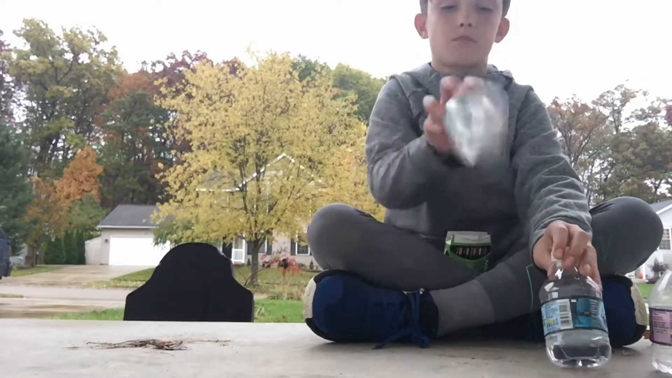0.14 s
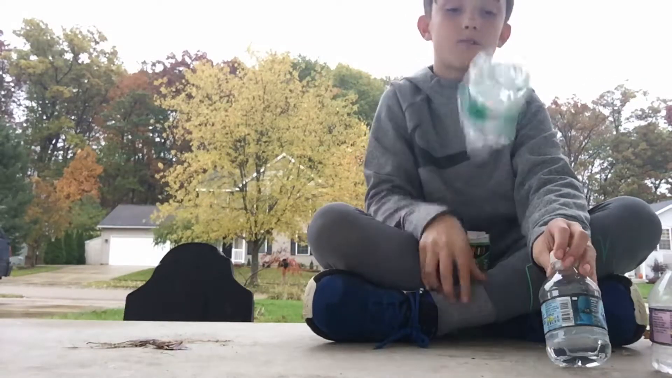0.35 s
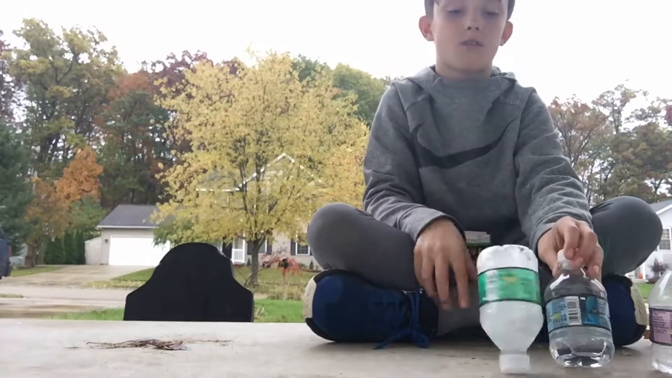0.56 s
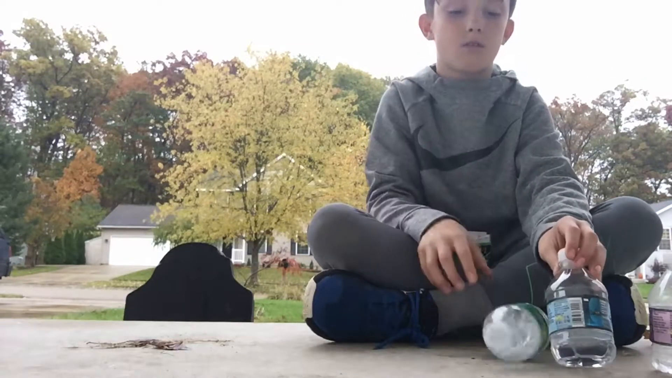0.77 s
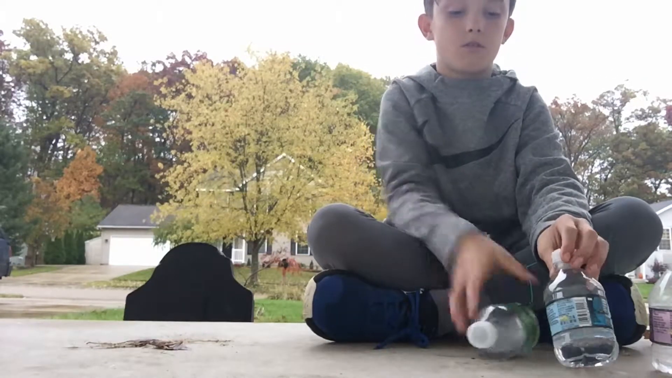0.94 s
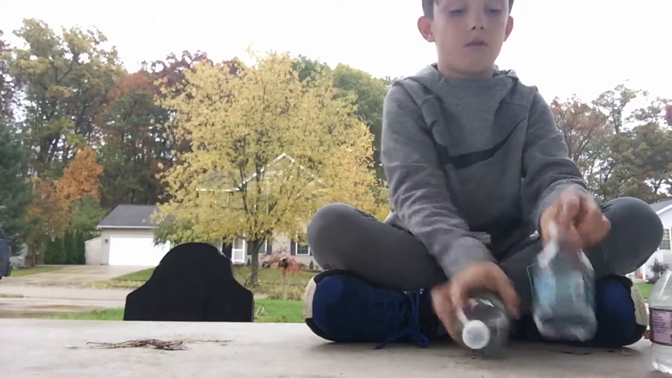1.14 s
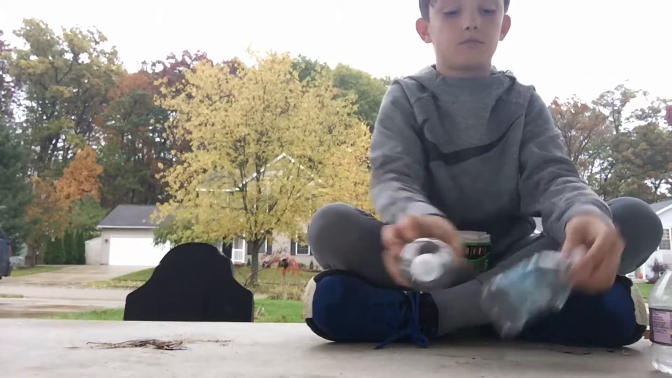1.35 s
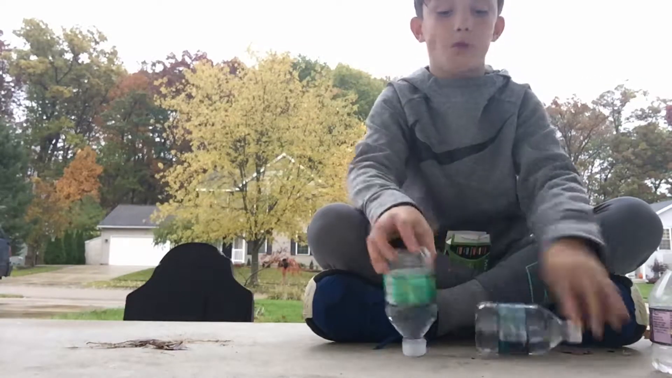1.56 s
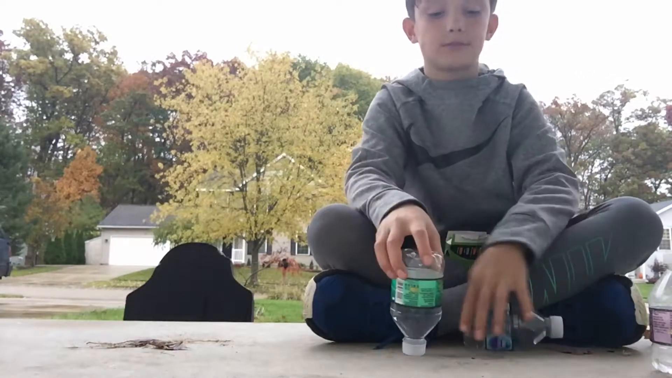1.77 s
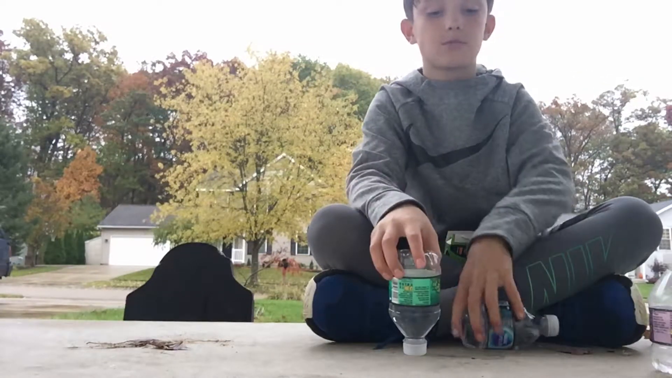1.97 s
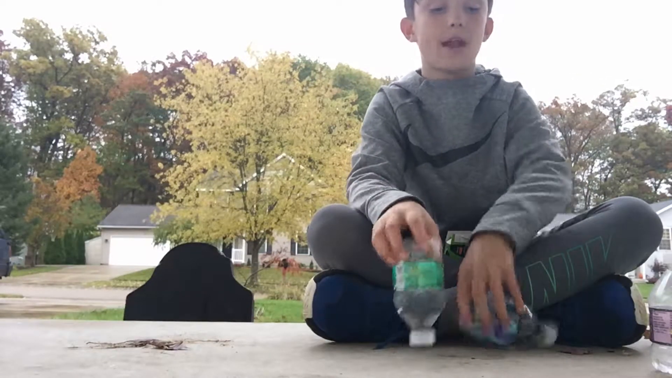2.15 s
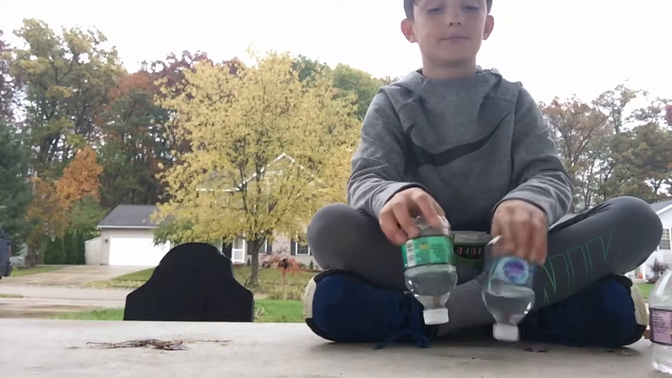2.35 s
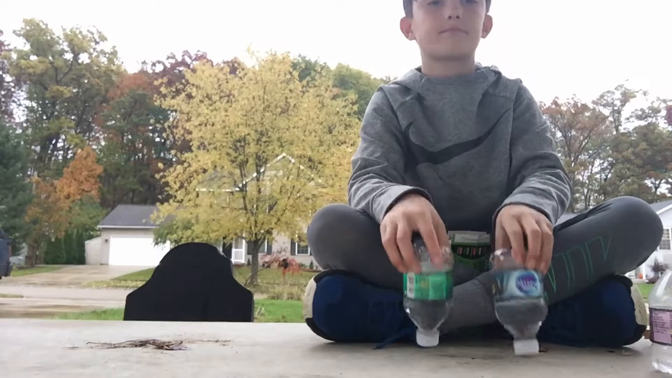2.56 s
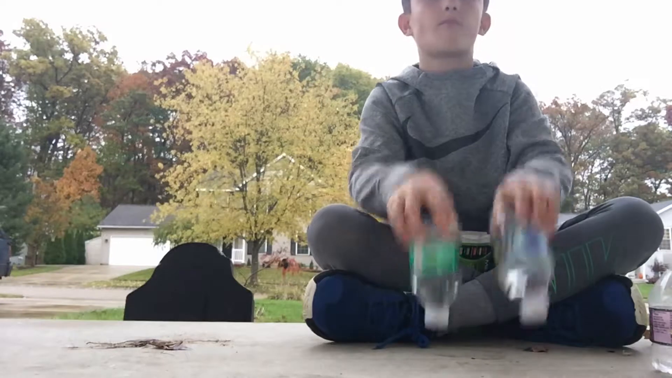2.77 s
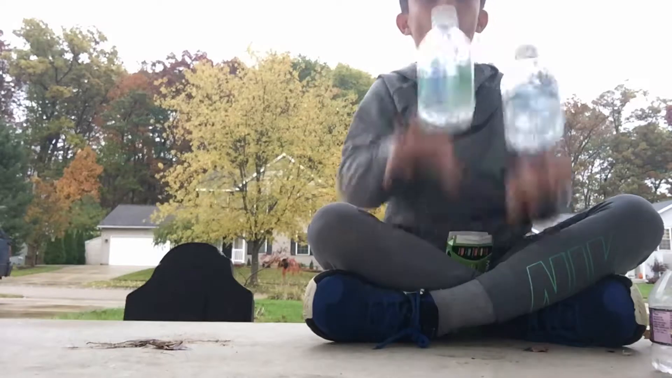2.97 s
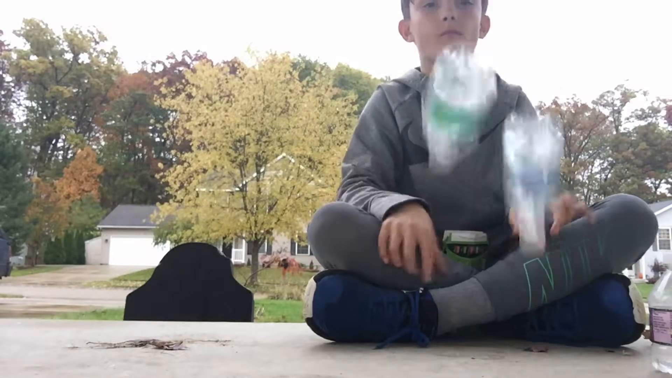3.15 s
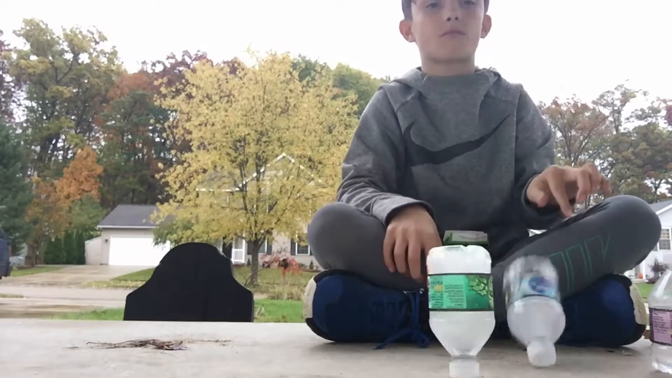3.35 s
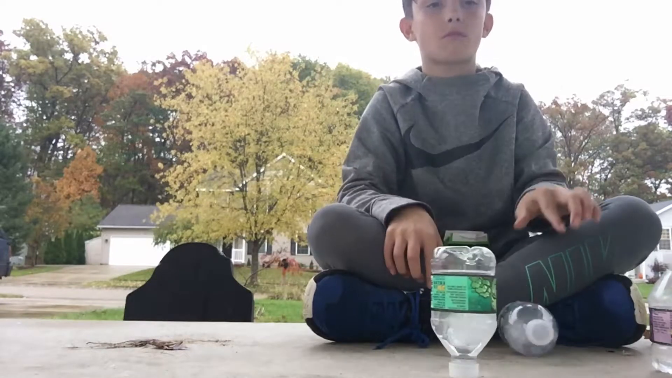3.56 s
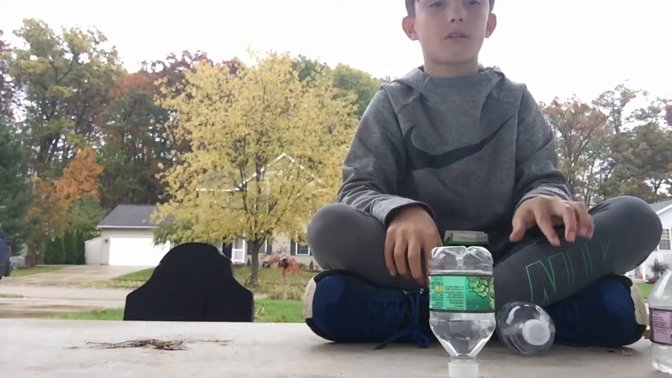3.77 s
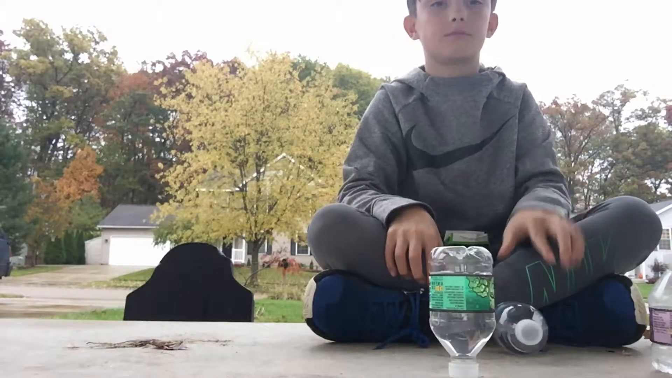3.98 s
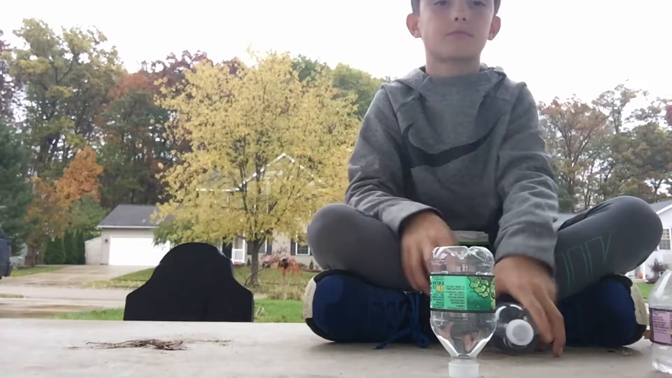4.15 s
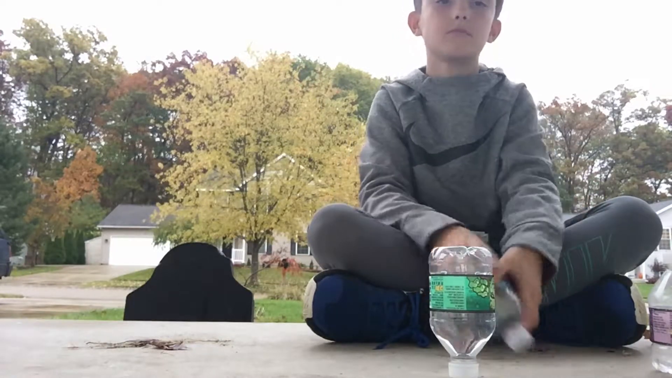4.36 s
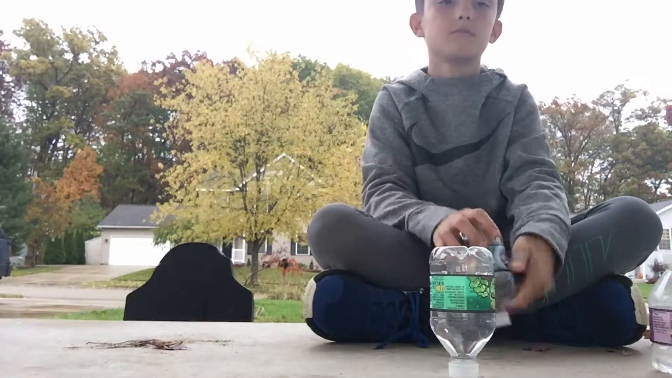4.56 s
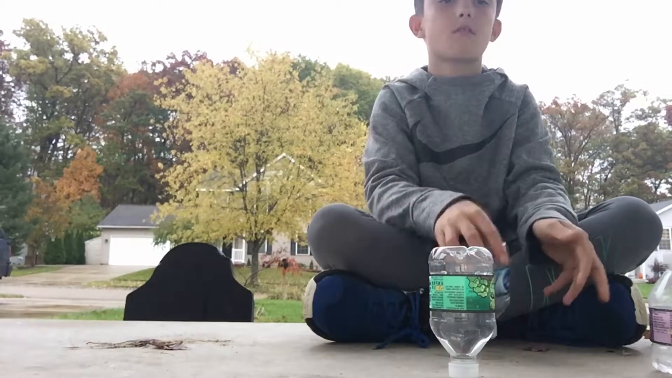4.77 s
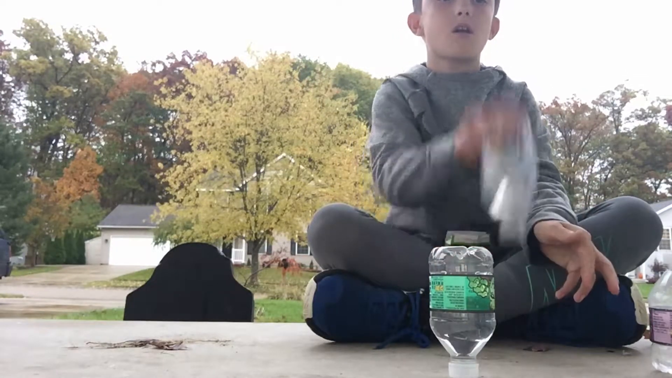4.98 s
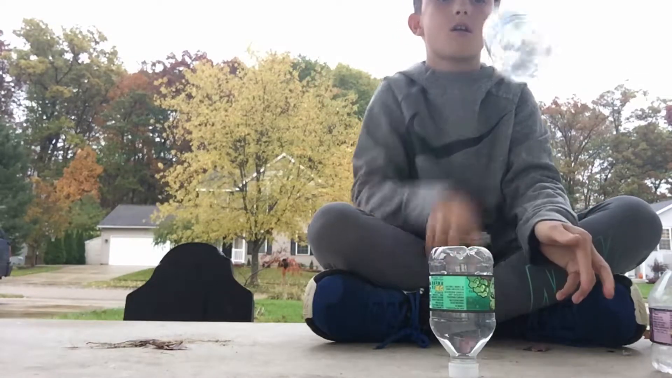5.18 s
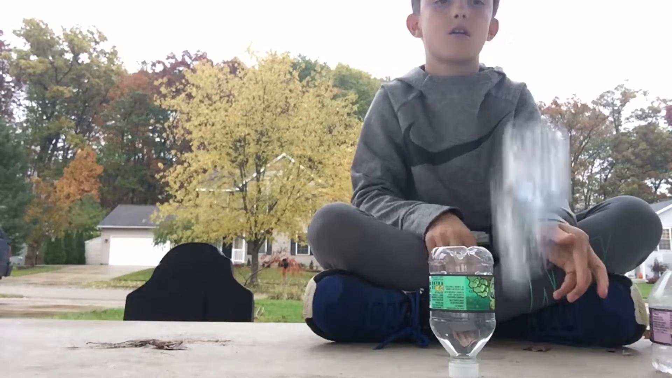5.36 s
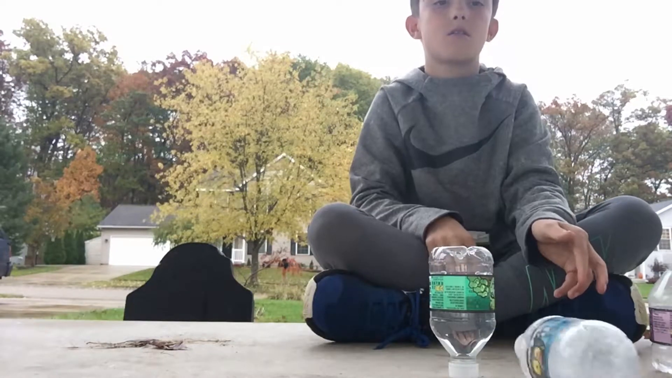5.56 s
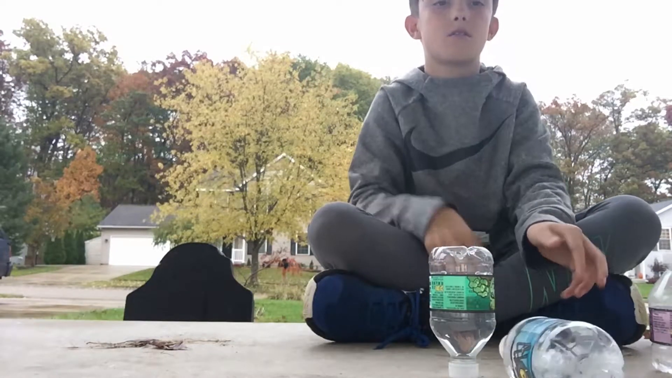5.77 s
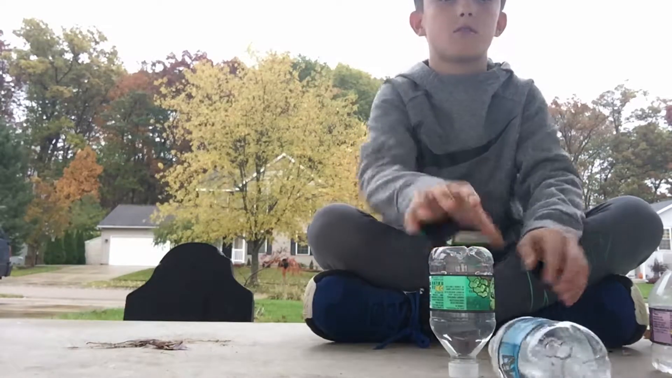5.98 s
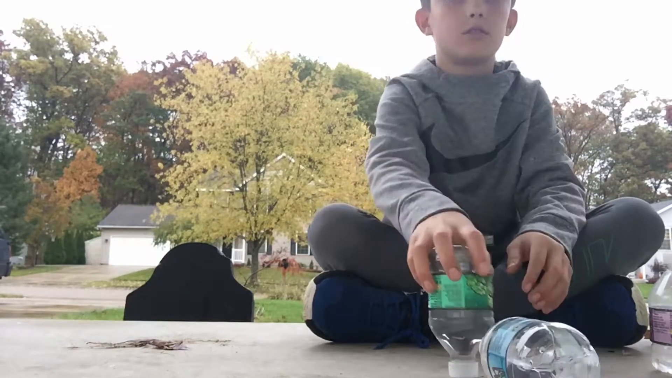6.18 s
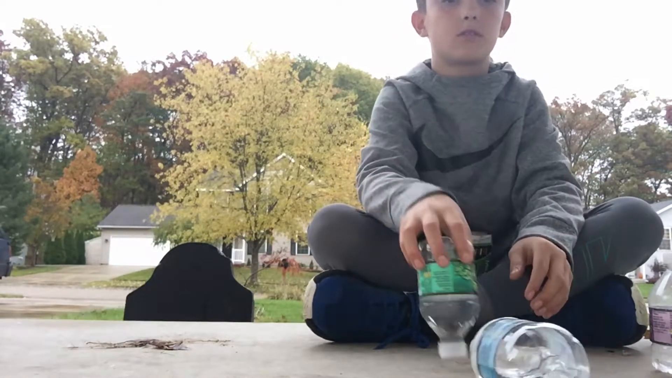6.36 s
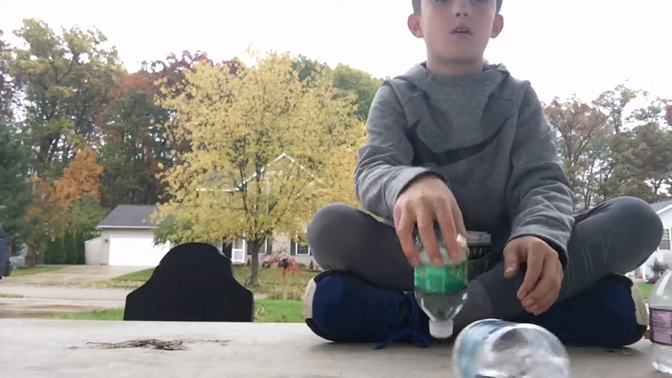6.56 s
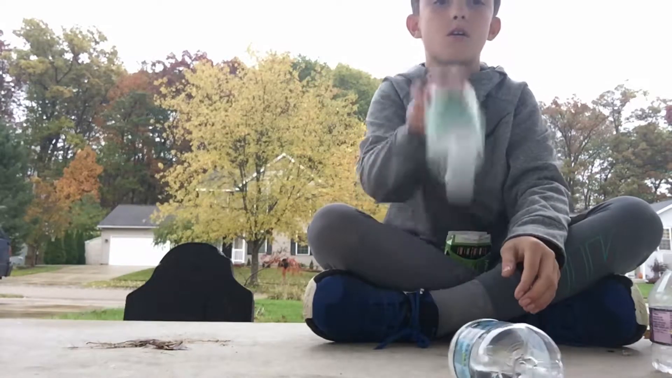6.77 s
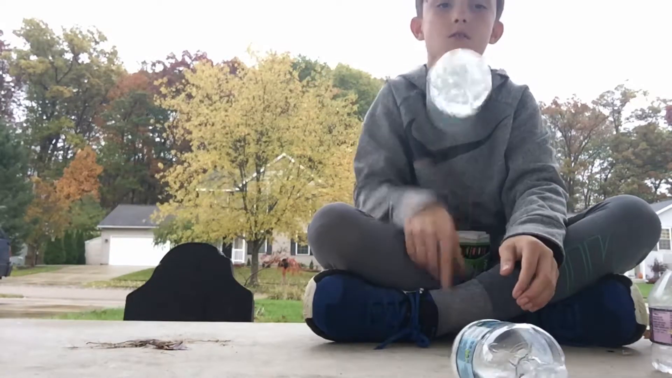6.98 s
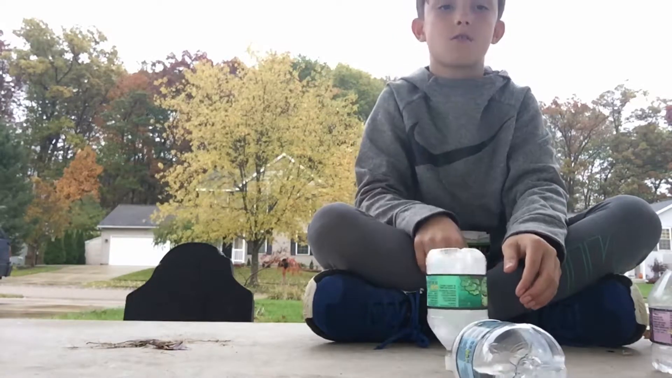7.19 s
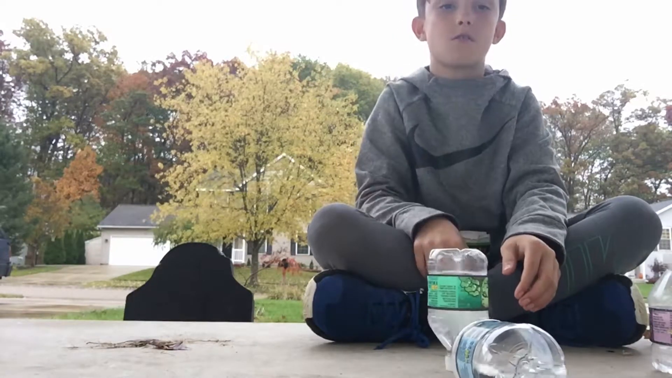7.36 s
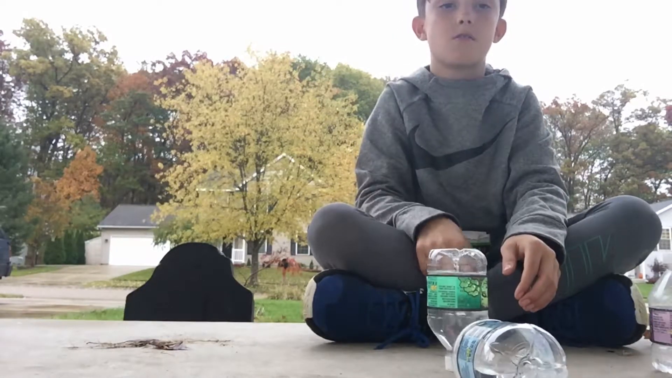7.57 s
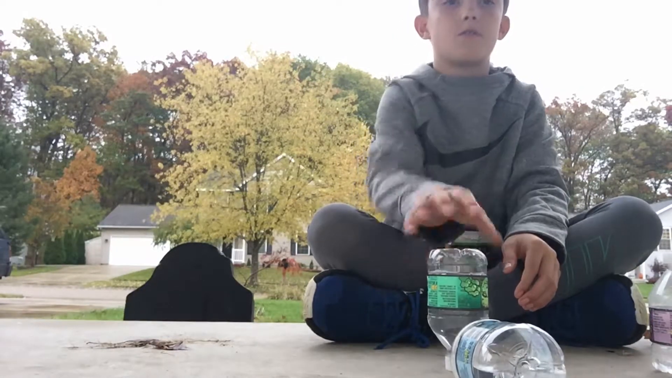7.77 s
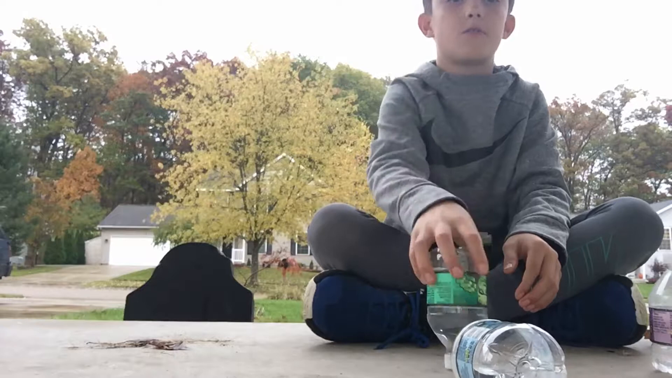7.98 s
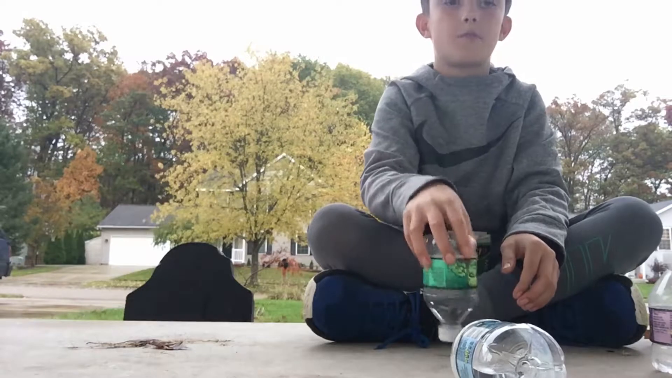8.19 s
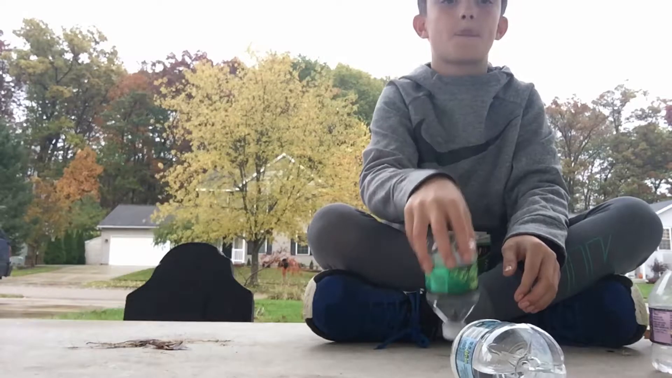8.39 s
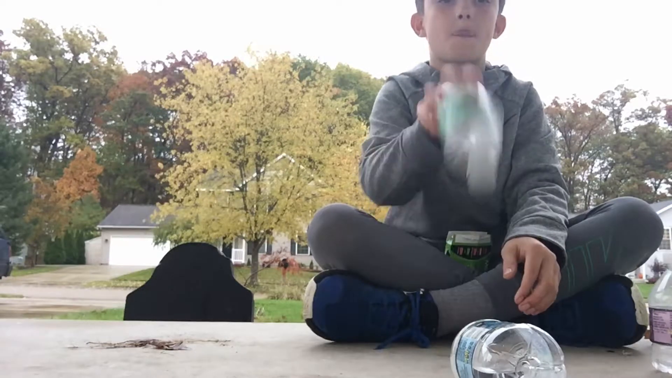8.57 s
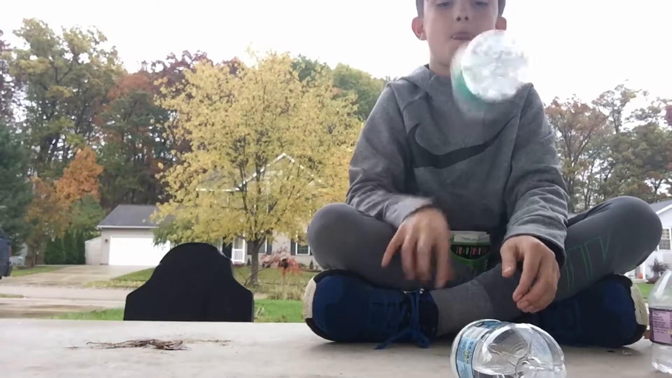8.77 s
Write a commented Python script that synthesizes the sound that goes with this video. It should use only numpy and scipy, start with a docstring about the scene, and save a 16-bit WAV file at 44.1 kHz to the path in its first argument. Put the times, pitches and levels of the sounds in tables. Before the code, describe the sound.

Partly filled plastic water bottles are flipped and crash onto a concrete slab with loud overloaded watery thuds, between crinkly handling and faint traffic.

```python
"""Water bottles flipped onto concrete

Partly filled plastic bottles land on a slab outdoors, close to a phone: crack, thud and splash overload its microphone.
The crack and splash are shaped noise and clicks; decaying sines make the thud of the water-loaded bottle.
In between, bottles topple and are handled: snaps, creases, gliding air pockets, sloshing and rustling grains.
Near walls and far houses answer as noise tails, over filtered-noise traffic and a wandering low drone."""
import sys
import numpy as np
from scipy import signal
from scipy.fft import rfft, irfft
from scipy.io import wavfile
from scipy.ndimage import uniform_filter1d

SR = 44100
rng = np.random.default_rng(int(sys.argv[2]) if len(sys.argv) > 2 else 0)


def pcm_store(signal):
    """Save signal as 16-bit PCM."""
    levels = np.round(np.clip(np.atleast_2d(signal), -1, 1) * 32767)
    wavfile.write(sys.argv[1], SR, levels.astype(np.int16).T)


N = 389403
TIME = np.arange(N) / SR  # s into the scene
AGE = TIME[:SR // 2]  # s since a sound began

# lighter knocks as a bottle topples, is set down or dents in the hand; levels before the gains in knocks():
# (time [s], wall level [dB], wall pitch [Hz], body level [dB], crinkle level [dB], rattle and crinkle t60 [s])
KNOCKS = [(0.0925, -41, 1890, -79, -59, 0.037), (0.8345, -33, 2510, -39.5, -47, .07),
          (0.8431, -32, 2020, -35.5, -44.5, 0.11), (0.867, -27, 2430, -29.5, -45, .11),
          (0.917, -29, 1150, -36, -37, 0.11), (1.5342, -26, 1130, -26, -45.5, 0.16),
          (1.587, -29, 1060, -30, -44, .08), (1.5997, -26.5, 2350, -31.5, -56, 0.078),
          (1.6332, -30, 3290, -32.5, -56, 0.056), (1.6935, -30, 1650, -26.5, -56, .06),
          (1.7735, -42, 1200, -42, -51, 0.079), (1.9412, -36.5, 1140, -45, -53, 0.045),
          (1.9818, -36, 2290, -53, -72, .06), (2.2497, -47, 1730, -34.5, -51, 0.12),
          (2.2954, -14.5, 1140, -24, -64, 0.026), (2.7013, -32.5, 1230, -35, -74, .05),
          (3.5295, -35.5, 1290, -41, -49.5, 0.13), (3.5625, -37, 1700, -34.5, -47, .1),
          (3.6378, -39.5, 1200, -56, -55, 0.069), (3.9649, -54, 1360, -49, -53.5, 0.047),
          (4.408, -46, 1060, -32.5, -52.5, 0.099), (4.8522, -37.5, 5300, -71, -69, 0.054),
          (5.6143, -20, 1900, -24.5, -37, 0.12), (5.7339, -40.5, 1180, -42, -62, .09),
          (7.8548, -56, 1230, -57.5, -55, .05)]
# mid-flight, the water tumbles to the other end of the bottle; levels before the gains of each layer:
# (time [s], spray level [dB], slap level [dB], first gulp level [dB], main gulp level [dB])
FLIPS = [(0.365, -49, -42.5, -51, -38), (3.098, -44.5, -39, -48.5, -43.5), (5.238, -54, -40.5, -64, -36.5),
         (7.031, -48.5, -41.5, -49.5, -31), (8.795, -51, -41.5, -42.5, -32.5)]


def undb(db):
    """Decibels to gain."""
    return 10 ** (np.asarray(db) / 20)


def unit(x):
    """Scale to rms 1."""
    return x / np.sqrt(np.mean(x ** 2))


def add(out, s, x):
    """Mix x into out from time s on."""
    i = int(s * SR)
    out[i:i + len(x)] += x[:max(N - i, 0)]


def response(points, size=2048):
    """Causal, minimum-phase impulse response with the spectrum (frequency [Hz], level [dB])."""
    hz, db = np.transpose(points)
    f = np.maximum(np.arange(size // 2 + 1) * SR / size, 1)
    level_db = np.interp(np.log(f), np.log(hz), db)
    cepstrum = irfft(np.log(undb(level_db)))
    # folding the cepstrum onto positive times makes the response causal
    cepstrum[1:size // 2] *= 2
    cepstrum[size // 2 + 1:] = 0
    return irfft(np.exp(rfft(cepstrum)))


def colour(x, points, size=2048):
    """Give x the shape of a spectrum; white noise keeps its power."""
    h = response(points, size=size)
    return signal.fftconvolve(x, h / np.linalg.norm(h))[:len(x)]


def tuned(shape, hz):
    """Place a spectrum of (multiple of pitch, level [dB]) at a pitch."""
    return np.array(shape) * [hz, 1]


def fade(t60):
    """Exponential decay by 60 dB in t60 seconds."""
    return np.exp(-np.log(1000) * AGE / max(t60, 1e-3))


def blow(t60, attack_s):
    """A smooth, quick rise and an exponential decay."""
    return fade(t60) * (1 - np.exp(-(AGE / attack_s) ** 2))


def swell(s, hold_s, attack_s, release_s):
    """An envelope that rises until time s, holds and dies away."""
    early = np.maximum(s - TIME, 0)
    late = np.maximum(TIME - s - hold_s, 0)
    return np.exp(-np.minimum(early / attack_s + late / release_s, 20))


def walk(rate):
    """Slow random wander of rms 1, from values drawn about rate times a second and smoothed twice."""
    k = int(SR / rate)
    steps = np.repeat(rng.standard_normal(N // k + 1), k)
    return unit(uniform_filter1d(uniform_filter1d(steps, k), k)[:N])


def ring(hz, t60):
    """One struck mode: a decaying sine."""
    return np.sin(2 * np.pi * hz * AGE) * fade(t60)


def resonate(x, hz, q):
    """A resonance with gain 1 at its centre."""
    return signal.lfilter(*signal.iirpeak(min(hz, .45 * SR), max(q, 1), fs=SR), x)


def grains(n, per_s, spread_db):
    """Random clicks of uneven size, rms 1."""
    sizes = undb(spread_db * np.minimum(rng.exponential(size=n), 4))
    struck = rng.random(n) < per_s / SR
    return unit(rng.standard_normal(n) * sizes * struck)


def creases(n, per_s, spread_db, q=9, count=14):
    """Tiny snaps spread over many patches of plastic, each with a pitch of its own; rms 1."""
    pitches = 1200 * 13 ** ((np.arange(count) + rng.random(count)) / count)
    patch_per_s = max(per_s / count, 60)
    return unit(sum(resonate(grains(n, patch_per_s, spread_db), hz, q) for hz in pitches))


def outdoors(level_db=-49.5, rumble_flicker_db=3.0, hum_hz=122, hum_wander=.05, hum_flicker_db=4.5):
    """Distant traffic rumble that wavers, smooth far tyre hiss, and a low drone that swells."""
    # distant traffic and trees, relative spectrum: (frequency [Hz], level [dB])
    air_shape = [(20, -34), (40, -22), (65, -1.5), (115, -3.5), (170, -14.5), (250, -20.5), (480, -33.5),
                 (800, -30.5), (1200, -23.5), (1800, -30), (3000, -37.5), (7000, -50.5), (9000, -41),
                 (11000, -52), (16000, -66.5)]
    # drone, before its flicker: (time [s], level [dB])
    hum_levels = [(0, -58.5), (4.5, -61), (7.3, -61), (7.7, -47), (8.3, -50), (8.83, -52)]
    air = undb(level_db) * colour(rng.standard_normal(N), air_shape, size=8192)
    rumble = signal.sosfiltfilt(signal.butter(2, 300, fs=SR, output="sos"), air)
    hiss = air - rumble
    hum = np.sin(2 * np.pi * np.cumsum(hum_hz * (1 + hum_wander * walk(25))) / SR)
    hum_db = np.interp(TIME, *np.transpose(hum_levels)) + hum_flicker_db * walk(11)
    return rumble * undb(rumble_flicker_db * walk(7.3)) + hiss + undb(hum_db) * hum


def sloshes(wash_gain_db=-4, spray_gain_db=-4, fizz_db=-5, fidget_db=-81, fidget_spread_db=3, lapping_db=2):
    """Running water stirs hollow resonances and fizzes, while droplets and fingers patter on the plastic."""
    # a bottle rolls or is tilted in the hand and its water runs, levels before the gains above:
    # (time [s], hold [s], wash level [dB], spray level [dB])
    moves = [(0.194, 0.13, -48.5, -63.5), (0.913, 0.062, -41.5, -63), (1.149, 0.074, -48.5, -61),
             (1.535, .35, -42.5, -58), (2.04, 0.21, -51, -61.5), (2.288, 0.012, -47, -57),
             (3.561, 0.043, -41.5, -56), (4.258, .15, -50, -61)]
    # relative spectra of wash and spray: (frequency [Hz], level [dB])
    wash_shape = [(120, -27), (250, 6.5), (370, 3), (490, -10.5), (630, 3.5), (900, -9), (2000, -16),
                  (5000, -31), (12000, -53.5)]
    spray_shape = [(700, -19.5), (1800, 0), (3800, 4.5), (6000, -1), (9000, -1), (12000, -5),
                   (16000, -16.5)]
    move_attack_s, move_release_s = .012, 0.087
    flip_swell_s, flip_fade_s, flip_wash_db = .042, .034, -47
    run_on_db, run_on_s = -16.5, 0.033  # after a knock: wash relative to its body level, time constant

    wash = sum(undb(body_db + run_on_db) * swell(s, 0, move_attack_s, run_on_s)
               for s, _, _, body_db, _, _ in KNOCKS)
    flows = [(swell(s, hold_s, move_attack_s, move_release_s), wash_db, spray_db)
             for s, hold_s, wash_db, spray_db in moves]
    flows += [(swell(s, 0, flip_swell_s, flip_fade_s), flip_wash_db, spray_db) for s, spray_db, *_ in FLIPS]
    spray = np.zeros(N)
    for flow, wash_db, spray_db in flows:
        wash = np.hypot(wash, undb(wash_db) * flow)
        spray += undb(spray_db) * flow
    # the hands are never quite still
    fidget = undb(fidget_db + fidget_spread_db * walk(9.8))
    spray = undb(spray_gain_db) * spray + fidget
    patter = creases(N, 4000, 2.4, q=25, count=20) + undb(fizz_db) * rng.standard_normal(N)
    lapping = undb(wash_gain_db + lapping_db * walk(25)) * wash * grains(N, 1500, 2.0)
    return colour(lapping, wash_shape) + colour(spray * patter, spray_shape)


def flip_slaps(wall_hz=1697, body_db=-2.5, crinkle_db=-4.5, t60=.11, backwash_s=.033, backwash_db=-6):
    """In each flip the water slaps the wall, swings back and slaps again; body and crinkle follow the slap."""
    slaps = [(s + delay_s, db + drop_db) for s, _, db, _, _ in FLIPS
             for delay_s, drop_db in [(0, 0), (backwash_s, backwash_db)]]
    return [(s, db, wall_hz, db + body_db, db + crinkle_db, t60) for s, db in slaps]


def knocks(snap_db=2, rattle_db=-4, body_gain_db=2.0, crinkle_gain_db=2, body_t60=.07, contact_s=0.00055):
    """A knock moves the filled body, snaps a patch of thin wall, and sets off a rattle and tiny creases."""
    # relative spectra of body and crinkle: (frequency [Hz], level [dB])
    body_shape = [(80, -27), (180, 0), (280, -0.5), (480, -5), (650, -1.5), (900, -11), (1500, -34.5),
                  (4000, -59.5)]
    crinkle_shape = [(1500, -21.5), (3500, 2), (6000, -1), (9000, -0.5), (12000, -4.5), (16000, -10)]
    # rattle of the wall, relative spectrum: (multiple of wall pitch, level [dB])
    wall_shape = [(.15, -24), (.45, -6), (.8, -7), (1, 0.5), (1.25, -7.5), (1.9, -9), (3, -20), (7, -36.5)]
    # modes of a snapping patch: (multiple of wall pitch, relative level [dB], t60 [s])
    snap_modes = [(.47, -9.5, .03), (1, 1, .017), (1.93, -11, .018)]
    # the bottle rocks back against the slab: (delay [s], body change [dB], wall change [dB])
    contacts = [(0, 0, 0), (.013, -8, -17)]

    body, wall, crinkle = np.zeros((3, N))
    for s, wall_db, wall_hz, body_db, crinkle_db, t60 in KNOCKS + flip_slaps():
        snap = sum(undb(db) * blow(mode_t60, contact_s) * np.sin(2 * np.pi * ratio * wall_hz * AGE)
                   for ratio, db, mode_t60 in snap_modes)
        add(wall, s, undb(wall_db + snap_db) * snap)
        crackle = blow(t60, contact_s) * creases(len(AGE), 8400, 2.2)
        add(crinkle, s, undb(crinkle_db + crinkle_gain_db) * crackle)
        for delay_s, body_drop_db, wall_drop_db in contacts:
            thump = blow(body_t60, contact_s) * rng.standard_normal(len(AGE))
            rattle = colour(blow(t60, contact_s) * grains(len(AGE), 9000, 1.6), tuned(wall_shape, wall_hz))
            add(body, s + delay_s, undb(body_db + body_gain_db + body_drop_db) * thump)
            add(wall, s + delay_s, undb(wall_db + rattle_db + wall_drop_db) * rattle)
    return colour(body, body_shape) + wall + colour(crinkle, crinkle_shape)


def brushes(hz=9590, q=2.8, attack_s=.008, hold_s=.012, release_s=.025):
    """Fingers and sleeves brush the plastic as hands reach and grip: each touch draws a short, fine rustle."""
    # (time [s], level [dB])
    touches = [(0.172, -60), (1.76, -53), (2.085, -61), (2.2, -70), (2.37, -53.5), (3.7, -61), (3.965, -60),
               (4.52, -66.5), (4.62, -62), (5.16, -63), (6.03, -59.5), (6.25, -64), (6.389, -63),
               (6.52, -61), (6.92, -61.5)]
    stray_per_s, stray_db, stray_spread_db = 2.5, -69, 3  # fainter touches at random times
    draws = rng.random((int(stray_per_s * N / SR), 2))
    stray = [(when * N / SR, stray_db + stray_spread_db * (2 * size - 1)) for when, size in draws]
    contact = sum(undb(db) * swell(s, hold_s, attack_s, release_s) for s, db in touches + stray)
    return contact * unit(resonate(creases(N, 4000, 2.4, q=25, count=24), hz, q))


def flip_gulps(first_hz=605, first_lead_s=.078, main_hz=364.2, rise_octaves=.04, length_s=.025):
    """Two air pockets in each flip: a small high gulp, then a lower one as the water slaps the wall."""
    first = [(s - first_lead_s, first_hz, rise_octaves, length_s, db) for s, _, _, db, _ in FLIPS]
    main = [(s, main_hz, rise_octaves, length_s, db) for s, *_, db in FLIPS]
    return first + main


def glugs(attack_s=0.0011):
    """As the water turns over, an air pocket rings, glides in pitch as its shape changes, and fades."""
    # (time [s], starting pitch [Hz], rise over one length [octaves], length [s], level [dB])
    pockets = [(0.641, 337, 0.38, 0.013, -4.5), (0.869, 335, -0.018, 0.025, -30),
               (1.531, 347, 0.042, .02, -24), (1.548, 400, 0.14, .022, -25),
               (1.59, 271.5, -0.058, 0.045, -26.5), (1.635, 247, -0.083, 0.0142, -20),
               (1.694, 615, -.06, 0.035, -27.5), (1.746, 630, .08, 0.162, -39),
               (1.861, 358, 0.25, 0.049, -34.5), (1.885, 631, 0.053, 0.024, -29.5),
               (2.046, 290, 0.039, 0.01, -36.5), (2.252, 346, .4, .032, -28.5),
               (2.277, 412.5, 0.095, 0.025, -22.5), (2.295, 567, .06, 0.0087, -14),
               (2.702, 593, -0.017, 0.01, -27.5), (3.38, 326, -.04, .016, -1),
               (3.434, 313, .08, 0.023, -10), (3.562, 266.2, 0.027, 0.17, -39.5),
               (4.409, 361, 0.15, 0.0091, -17.5), (5.548, 297, 0.075, .018, -6),
               (6.005, 330, -0.027, .015, -22), (6.247, 630, -0.06, .012, -42)]
    out = np.zeros(N)
    for s, hz, rise, length, db in pockets + flip_gulps():
        progress = np.minimum(AGE / length, 4)
        phase = 2 * np.pi * np.cumsum(hz * 2 ** (rise * progress)) / SR
        envelope = (1 - np.exp(-AGE / attack_s)) * np.exp(-progress ** 2)
        add(out, s, undb(db) * np.sin(phase) * envelope)
    return out


def landings(crack_t60=.014, splash_t60=.13, slap_t60=.04, swell_s=.0014, contact_s=0.00098,
             punch_hz=235, punch_t60=.028, pocket_t60=0.073, detune=0.014):
    """Plastic cracks on the slab, the water's weight makes the bottle thud, then water falls back and spatters."""
    # each landing; the other levels add to the first, and the slap is cut by a further 11.5 dB:
    # (time [s], level [dB], thud pitch [Hz], thud t60 [s], air pocket pitch [Hz], air pocket level [dB],
    #  shell level [dB], punch level [dB], crack pitch [Hz], crack level [dB], splash level [dB],
    #  delay of the water's slap [s], slap level [dB])
    impacts = [(0.6207, 0, 310.6, 0.098, 638, -7, -2.5, 4, 1134, 2.5, -17, .013, -17),
               (3.3598, 3.5, 258, 0.092, 417, -1, -4, 5, 1747, 7.5, -18, 0.031, -15),
               (3.4025, 3, 229.7, 0.07, 629, 0.5, -2, 4.5, 1620, -5, -15.5, 0.0059, 3.5),
               (5.5275, 1.5, 283.7, .081, 573, -7.5, -2.5, 3.5, 1790, 4, -15.5, 0.012, -2.5),
               (7.264, 1, 349, 0.1, 713, -6.5, -3, 1, 2010, 0.5, -15.5, 0.022, -8)]
    # modes of the bottle, before detuning: (frequency [Hz], relative level [dB], t60 [s])
    modes = [(116, -17.5, 0.11), (164.5, -9.5, 0.086), (222, -15, 0.28), (270.7, -3, .1), (328, -12, 0.19),
             (388, -6, 0.071), (482.3, -11.5, 0.078), (614, -11.5, 0.086), (685, -10.5, .06),
             (766, -7.5, 0.055), (1061, -13.5, 0.072), (1173, -20, 0.11), (1410, -22.5, .05),
             (1667, -19.5, 0.13), (1880, -26.5, 0.073), (2597, -27, 0.11), (2800, -16.5, .04)]
    # crack, relative spectrum: (multiple of crack pitch, level [dB])
    crack_shape = [(.1, -11), (.35, -1.5), (.7, 0.5), (1, 1.5), (1.6, -9), (2.6, -21), (4.5, -22), (6, -23),
                   (9, -25.5)]
    # splash, relative spectrum: (frequency [Hz], level [dB])
    splash_shape = [(200, -4), (600, 2), (1500, -1.5), (2800, -3.5), (4500, -5.5), (7000, -9),
                    (10000, -16.5), (16000, -22.5)]

    out, splashes = np.zeros((2, N))
    for (s, db, hz, t60, pocket_hz, pocket_db, shell_db, punch_db,
         crack_hz, crack_db, splash_db, slap_s, slap_db) in impacts:
        # the water lies differently each time and shifts the wall's modes a little
        shifts = 1 + detune * rng.uniform(-1.1, 1, len(modes))
        shell = sum(undb(d) * ring(f * shifts[k], t) * (-1) ** k for k, (f, d, t) in enumerate(modes))
        # the base flexes hard for a few cycles, then the water and its air pocket ring on
        punch = undb(punch_db) * ring(punch_hz, punch_t60)
        water = punch + ring(hz, t60) + undb(pocket_db) * ring(pocket_hz, pocket_t60)
        onset = 1 - np.exp(-(AGE / swell_s) ** 2)
        add(out, s, undb(db) * onset * (water + undb(shell_db) * shell))
        burst = blow(crack_t60, contact_s) * rng.standard_normal(len(AGE))
        add(out, s, undb(db + crack_db) * colour(burst, tuned(crack_shape, crack_hz)))
        splash = blow(splash_t60, contact_s) * grains(len(AGE), 12000, 0.83)
        add(splashes, s, undb(db + splash_db) * splash)
        slap = blow(slap_t60, contact_s) * grains(len(AGE), 12000, 0.63)
        add(splashes, s + slap_s, undb(db + slap_db - 11.5) * slap)
    return out + colour(splashes, splash_shape)


def rubs(q=3):
    """Fingers or the slab slide over the plastic: contact swells and fades in a soft, grainy rush."""
    # (time of peak [s], length [s], centre frequency [Hz], level [dB])
    slides = [(0.887, 0.045, 1600, -45.5), (1.63, 0.084, 1880, -48), (1.88, 0.027, 2030, -48),
              (2.324, 0.039, 1260, -42.5)]
    out = np.zeros(N)
    for s, length, hz, db in slides:
        rush = unit(resonate(resonate(grains(N, 12000, 1), hz, q), hz, 1))
        out += undb(db) * rush * np.exp(-np.minimum(((TIME - s) / length) ** 2, 20))
    return out


def surroundings(x, near_db=-45, near_t60=.24, gap_s=.005, far_db=-75, far_s=.26, far_spread_s=0.11):
    """Slab, legs and near walls scatter a short tail; far houses return a dull echo."""
    near_envelope = fade(near_t60) * (1 - np.exp(-(AGE / gap_s) ** 2))
    near = undb(near_db) * near_envelope * rng.standard_normal(len(AGE))
    far_envelope = np.exp(-((AGE - far_s) / far_spread_s) ** 2)
    far = undb(far_db) * far_envelope * rng.standard_normal(len(AGE))
    # this spectrum also shifts the level of the echo
    dulling = response([(150, 9.5), (300, -2.5), (700, -12.5), (2500, -6.5), (8000, -15)])
    far = signal.fftconvolve(far, dulling)[:len(AGE)]
    return x + signal.fftconvolve(x, near + far)[:N]


def microphone_port(x):
    """Close sounds meet the notch and peak of the microphone port."""
    # (frequency [Hz], gain [dB])
    port = [(100, 1.5), (3000, -2.5), (5200, -8), (7200, -7), (8000, 2.5), (9300, 2), (10500, -2.5),
            (16000, -4)]
    return signal.fftconvolve(x, response(port))[:N]


def scene():
    """The bottles in their surroundings, heard close through the port, over the outdoor background."""
    bottles = sloshes() + knocks() + brushes() + glugs() + landings() + rubs()
    return (outdoors() + microphone_port(surroundings(bottles)))[None]


def record(dry, ceiling=1.57, release_s=0.1, knee=5, top_hz=15700):
    """The phone ducks after an overload, flattens the highest peaks and cuts the top."""
    over = np.log(np.maximum(np.abs(dry[0]) / ceiling, 1 + 1e-9))
    # the largest recent overload is held and let go exponentially
    held = np.exp(np.maximum.accumulate(np.log(over) + TIME / release_s) - TIME / release_s)
    ducked = dry * np.exp(-uniform_filter1d(held, size=64))
    clipped = ducked / (1 + np.abs(ducked) ** knee) ** (1 / knee)
    return signal.sosfilt(signal.ellip(8, .1, 70, top_hz, fs=SR, output="sos"), clipped)


dry = scene()
out = record(dry)
pcm_store(out)
```